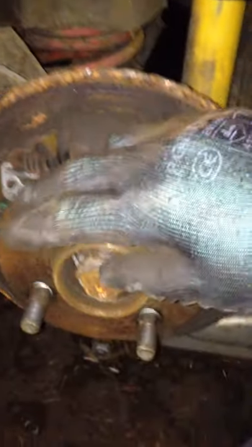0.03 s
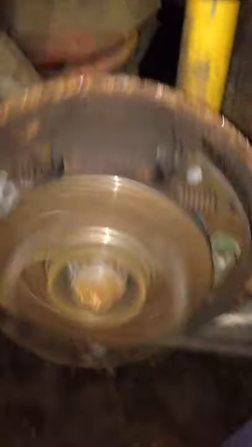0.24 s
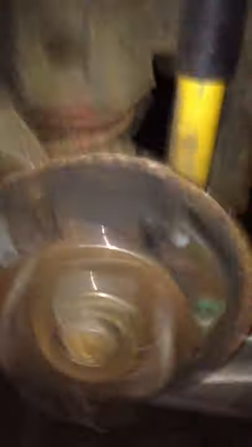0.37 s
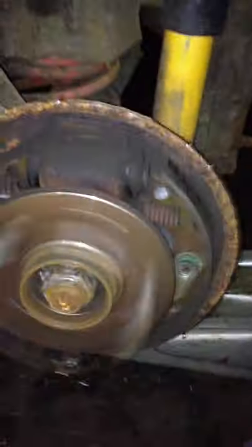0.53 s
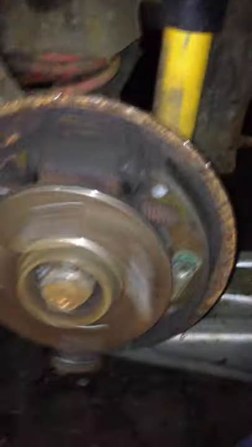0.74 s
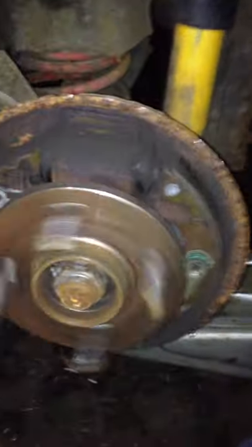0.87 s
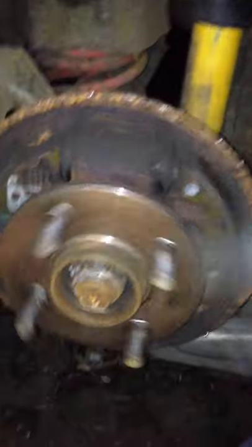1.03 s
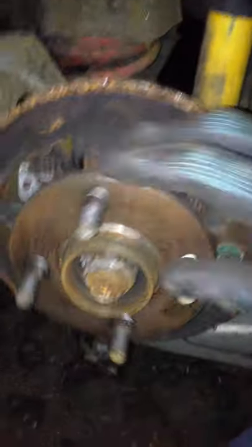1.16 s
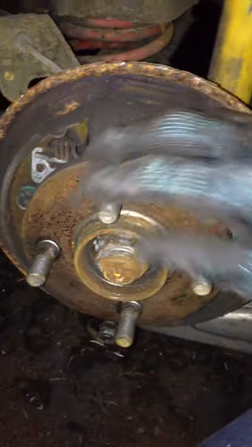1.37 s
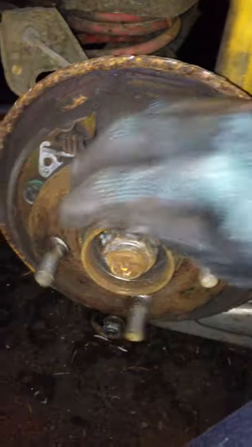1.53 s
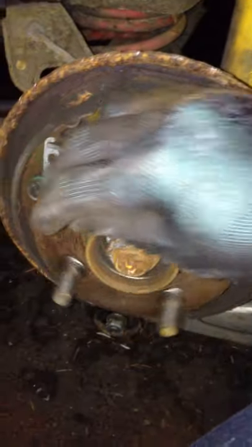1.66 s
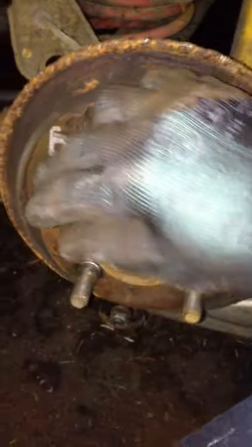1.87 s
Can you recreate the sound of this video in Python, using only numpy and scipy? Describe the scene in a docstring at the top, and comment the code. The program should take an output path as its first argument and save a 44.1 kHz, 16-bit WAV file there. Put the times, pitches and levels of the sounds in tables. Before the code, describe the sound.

Close up in a quietly humming garage, a worn wheel bearing spins with a gritty metallic grinding that flares at rough spots and slows to a halt. Soft glove rubbing and one small tick follow.

```python
"""In a garage, a gloved hand flicks a rusty wheel hub, which coasts to a stop on its worn bearing.
Rollers judder over pitted tracks and shake the hub's mount and backing plate; grit crunches and rings
its steel rim. The grinding flares at rough spots and grows duller as the hub slows. Then the glove
brushes the hub, turns it a little and ticks on a stud. The room rumbles and hums low throughout."""
import sys
import numpy as np
from scipy.fft import rfft, irfft, next_fast_len
from scipy.io import wavfile
from scipy.ndimage import map_coordinates

SR = 44100
rng = np.random.default_rng(int(sys.argv[2]) if len(sys.argv) > 2 else 0)


def wav_out(sig):
    """Save sig, one row per channel (or a flat mono array), as 16-bit PCM at SR to the path in sys.argv[1]."""
    wavfile.write(sys.argv[1], SR, np.round(np.clip(np.atleast_2d(sig).T, -1, 1) * 32767).astype(np.int16))


N = 83790

# rough spots where the bearing catches: middle_s, length_s, judder_db, grit_db
ROUGH_SPOTS = [(0.265, 0.037, 3.5, 1), (0.3, 0.048, 2, 3.5), (0.351, 0.012, 4.5, 5), (0.394, 0.013, 4, 3),
               (0.431, 0.0038, 3.5, 2), (0.476, 0.042, -0.5, 4), (0.543, 0.041, 5.5, 5),
               (0.584, 0.0071, -0.5, 3), (0.636, 0.012, 3, 5), (0.736, 0.0083, 5.5, 7.5),
               (0.772, 0.014, 1, 2.5), (.85, 0.0083, 7, 8), (0.873, .014, 7, 11.5), (0.972, 0.024, 3.5, 5),
               (1.035, 0.0085, 7.5, -9), (1.092, .014, 7, 12)]
# tone of the rollers' rumble: pitch_hz, level_db
RUMBLE_TONE = [(40, -39), (95, -33), (160, -13), (230, -3.5), (330, -3.5), (600, -16.5), (1200, -7),
               (2000, -27.5), (5000, -38)]


def amp(db):
    """Turn decibels into a gain."""
    return 10 ** (np.asarray(db) / 20)


def unit(x):
    """Scale a signal to an average power of 1."""
    return x / np.sqrt(np.mean(x ** 2) + 1e-20)


def clock():
    """The time of each sample in seconds."""
    return np.arange(N) / SR


def curve(rows):
    """Straight lines through (time_s, value) points."""
    return np.interp(clock(), *np.transpose(rows))


def swell(middle_s, length_s):
    """A smooth rise to 1 and fall around a moment."""
    return np.exp(-(2 * (clock() - middle_s) / length_s) ** 2 / 2)


def filtered(x, response):
    """Pass x through a filter, given as a function of frequency."""
    size = next_fast_len(N + SR // 2)
    return irfft(rfft(x, size) * response(np.fft.rfftfreq(size, 1 / SR)), size)[:N]


def tone(points):
    """A filter shaped by (pitch_hz, level_db) points, with an average power of 1."""
    def response(f):
        hz, db = np.transpose(points)
        cepstrum = irfft(np.log(amp(np.interp(np.log(f + 1), np.log(hz), db))))
        # fold it so that no sound comes ahead of its hit
        cepstrum[1:len(cepstrum) // 2] *= 2
        cepstrum[len(cepstrum) // 2 + 1:] = 0
        gain = np.exp(rfft(cepstrum))
        return gain / np.sqrt(np.mean(abs(gain) ** 2))
    return response


def ringing(modes):
    """A filter that rings at a part's own pitches, with an average power of 1."""
    def response(f):
        gain = sum((-1) ** k * amp(db) * 1j * f * width / (hz * hz - f * f + 1j * f * width)
                   for k, (hz, width, db) in enumerate(modes))
        return gain / np.sqrt(np.mean(abs(gain) ** 2))
    return response


def noise(points):
    """Steady noise with the given tone."""
    return unit(filtered(rng.standard_normal(N), tone(points)))


def contacts(per_s, scatter_db, rub):
    """Tiny random hits of uneven size over some smooth rubbing."""
    chance = np.clip(per_s / SR, 1e-4, 1)
    size = amp(scatter_db * rng.uniform(-1, 1, N))
    hits = (rng.random(N) < chance) / np.sqrt(chance) * np.sign(rng.standard_normal(N))
    return unit(unit(hits * size) + rub * rng.standard_normal(N))


def waver(per_s, depth_db):
    """A gain that wanders smoothly at random."""
    drift = map_coordinates(rng.standard_normal(2048), [clock() * per_s], mode='wrap')
    return unit(amp(depth_db * np.tanh(drift)))


def garage():
    """The room rumbles steadily and machinery hums faintly."""
    # tone of the room: pitch_hz, level_db
    room_tone = [(15, -88), (25, -46), (48, -7), (57, -40), (69, -12), (139, -2), (172, -4.5), (293, -4),
                 (363, -11.5), (427, -7), (621, -13), (952, -6.5), (1670, -12.5), (2560, -24), (4150, -26),
                 (9520, -33), (15000, -32.5)]
    # machinery hum: pitch_hz, level_db
    hum_notes = [(81, -73.5), (172, -65.5)]
    hum = sum(amp(db) * np.sqrt(2) * np.sin(2 * np.pi * hz * clock()) * waver(per_s=4, depth_db=3)
              for hz, db in hum_notes)
    return amp(-56) * noise(room_tone) + hum


def glove_swish():
    """The glove slides on the hub as the flick begins."""
    # tone of the slide: pitch_hz, level_db
    swish_tone = [(1500, -12), (3000, -14), (5000, 0), (8300, 2), (10000, -8), (15000, -7)]
    return amp(-57.5) * swell(middle_s=.163, length_s=.03) * noise(swish_tone)


def rollers(speed, load):
    """Rollers bump over pits and shake the heavy parts; the brighter layers fade first as they slow."""
    # knocks from deep pits: start_s, above_judder_db
    deep_pits = [(.261, 21), (.287, 21.5), (.401, 28.5), (.869, 35), (.878, 35), (1.095, 37.5)]
    # ringing of the hub's mount: pitch_hz, width_hz, level_db
    mount_modes = [(240.4, 39, -0.5), (274.6, 30, 2.5), (312.8, 19.5, 4), (437, 92, -2.5), (508.4, 55, -1),
                   (613, 28, -4.5), (717.5, 22, -3), (837, 30, -8)]
    # ringing of the backing plate: pitch_hz, width_hz, level_db
    plate_modes = [(964.6, 25, 4), (1138, 61, -1.5), (1177, 27, 4), (1213, 46, -2), (1281.4, 27.5, 2),
                   (1479, 48, -1.5), (1696, 94, -6.5), (1780, 58, -10.5)]
    # tone of the grinding: pitch_hz, level_db
    grind_tone = [(120, -39), (400, -8), (800, 5), (1250, 3), (1650, -14.5), (2000, -4.5), (3000, -17),
                  (6000, -28.5)]
    knocks = np.zeros(N)
    for start_s, db in deep_pits:
        knocks[round(start_s * SR)] += amp(db)
    flare = amp(sum(db * swell(s, length) for s, length, db, _ in ROUGH_SPOTS))
    bumps = lambda: knocks + flare * load * contacts(1100 * np.sqrt(speed), scatter_db=7.5, rub=.25)
    bass_loss = lambda f: 1 / np.sqrt(1 + (185 / (f + 1)) ** 8)  # small parts give off little bass
    mount = amp(-33) * filtered(bumps() * speed ** 1.163, lambda f: ringing(mount_modes)(f) * bass_loss(f))
    rumble = amp(-37) * filtered(bumps() * speed ** 1.21, tone(RUMBLE_TONE))
    plate = amp(-31.5) * filtered(bumps() * speed ** 2.15, ringing(plate_modes))
    grind = amp(-35) * filtered(bumps() * speed ** 2, tone(grind_tone))
    return mount + rumble + plate + grind


def grit(speed, load):
    """Grit crunches in the bearing and rings the steel rim; the highest sounds need the most speed."""
    # tone of the crunch: pitch_hz, level_db
    crunch_tone = [(700, -22.5), (2000, -2.5), (2600, -3), (3500, 1.5), (4300, -2), (5400, -11),
                   (8000, -13), (15000, -33.5)]
    # tone of the fine fizz: pitch_hz, level_db
    fizz_tone = [(2000, -33), (4500, -0.5), (6000, -5), (7500, -4), (9200, -1.5), (10500, -4.5),
                 (12400, -2.5), (13800, -10), (15300, -13)]
    # ringing of the hub's rim: pitch_hz, width_hz, level_db
    rim_modes = [(2735, 60, -7), (3524, 38, 2), (3931, 50, 0), (5574, 14, -1), (6767, 30, -5),
                 (6904, 42, -3), (7380, 34, -2), (8680, 70, -2), (9170, 45, -7), (10311, 20, -3),
                 (11630, 35, -9), (12300, 80, -10)]
    split_hz, release_s, grip_db = 6200, .238, -9
    low_modes = [mode for mode in rim_modes if mode[0] < split_hz]
    high_modes = [mode for mode in rim_modes if mode[0] >= split_hz]
    held = (1 - np.tanh((clock() - release_s) / .002)) / 2
    grip = amp(grip_db * held)  # the glove muffles these sounds until it lets go
    flare = amp(sum(db * swell(s, length) for s, length, _, db in ROUGH_SPOTS))
    pressure = flare * load * waver(per_s=280, depth_db=2.5)
    grains = lambda: pressure * contacts(4600 * speed, scatter_db=4, rub=.44)
    crunch = amp(-40) * filtered(grains() * np.sqrt(grip) * speed ** 1.31, tone(crunch_tone))
    fizz = amp(-38) * filtered(grains() * grip * speed ** 2.84, tone(fizz_tone))
    low_ring = amp(-40) * filtered(grains() * np.sqrt(grip) * speed ** 1.4, ringing(low_modes))
    high_ring = amp(-39.5) * filtered(grains() * grip * speed ** 2.35, ringing(high_modes))
    return crunch + fizz + low_ring + high_ring


def bearing():
    """The hub spins up and coasts down; its speed drives both the rollers and the grit."""
    # how fast the hub turns: time_s, share_of_top_speed
    hub_speed = [(.14, 0), (.2, 0.36), (.248, 0.89), (.4, 0.91), (.49, 0.64), (.6, 0.65), (.76, 0.46),
                 (.82, 0.31), (.99, .17), (1.08, 0.053), (1.19, 0.016)]
    speed = np.clip(curve(hub_speed), 1e-4, 2)
    load = waver(per_s=190, depth_db=1.5)  # the weight shifts from roller to roller
    return rollers(speed, load) + grit(speed, load)


def release_thud():
    """A short, low thud as the hand lets go."""
    middle_s, pitch_hz = .268, 118
    return amp(-43) * swell(middle_s, length_s=.016) * np.sin(2 * np.pi * pitch_hz * (clock() - middle_s))


def glove_brushes():
    """The glove rubs the hub in soft, uneven strokes."""
    # strokes: middle_s, length_s, level_db
    strokes = [(1.217, .06, -65.5), (1.512, 0.23, -64), (1.65, 0.042, -66), (1.733, 0.035, -62),
               (1.865, 0.063, -66.5)]
    # tone of the rubbing glove: pitch_hz, level_db
    glove_tone = [(300, -30), (1500, -3.5), (3000, 1.5), (5000, 0), (7700, 2), (10000, -8), (15000, -2)]
    level = sum(amp(db) * swell(s, length) for s, length, db in strokes)
    return level * noise(glove_tone) * waver(per_s=50, depth_db=5.5)


def hub_nudge():
    """The hand turns the hub back slowly, and the rollers rumble faintly."""
    # loudness of the turn: time_s, level_db
    turn_levels = [(1.3, -77), (1.42, -73), (1.57, -64.5), (1.68, -65), (1.78, -75), (1.9, -85)]
    bumps = contacts(per_s=180, scatter_db=7, rub=.68)
    return amp(curve(turn_levels)) * filtered(bumps, tone(RUMBLE_TONE))


def stud_tick():
    """A fingertip meets a wheel stud, which rings very briefly."""
    # ringing of the stud: pitch_hz, width_hz, level_db
    stud_modes = [(1200, 600, -8), (2870, 160, 3), (4200, 380, -1), (5200, 900, -7), (7800, 2000, -14)]
    start_s, fade_s = 1.7102, .014  # the tap falls 60 dB in fade_s
    age = clock() - start_s
    tap = (age > 0) * amp(-48.5 - 60 * abs(age) / fade_s) * rng.standard_normal(N)
    return filtered(tap, ringing(stud_modes))


def scene():
    """All the sounds add up at one close microphone."""
    mix = garage() + glove_swish() + bearing() + release_thud()
    return (mix + glove_brushes() + hub_nudge() + stud_tick())[None]


def record(dry):
    """The microphone weakens the deep bass and cuts off the highest treble."""
    bass_hz, top_hz = 60, 15400
    return filtered(dry[0], lambda f: (f < top_hz) / np.sqrt(1 + (bass_hz / (f + 1)) ** 4))[None]


dry = scene()
out = record(dry)
wav_out(out)
```